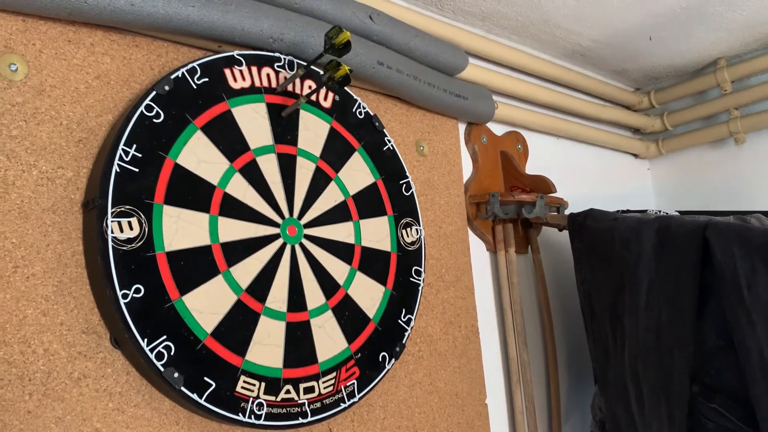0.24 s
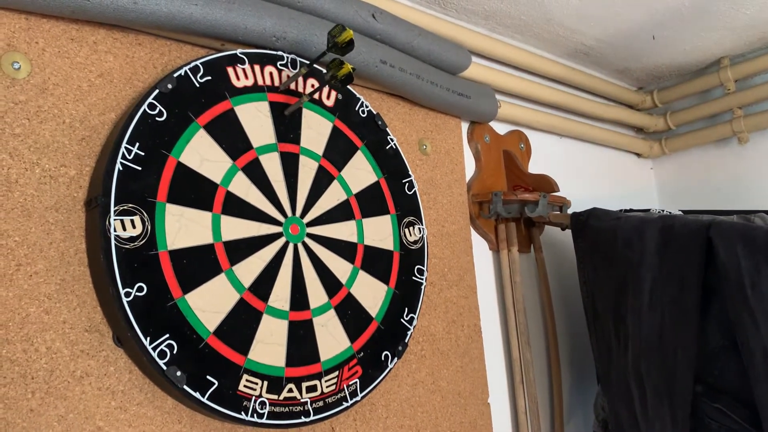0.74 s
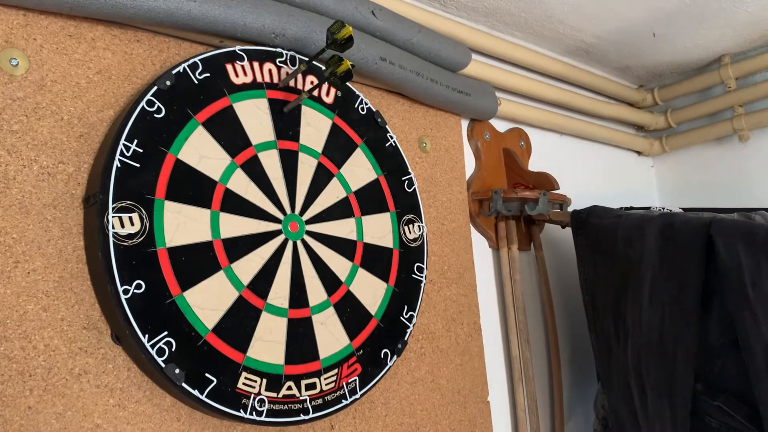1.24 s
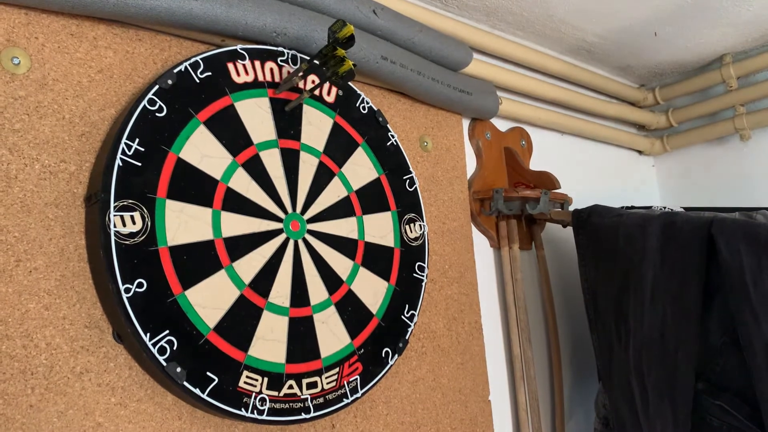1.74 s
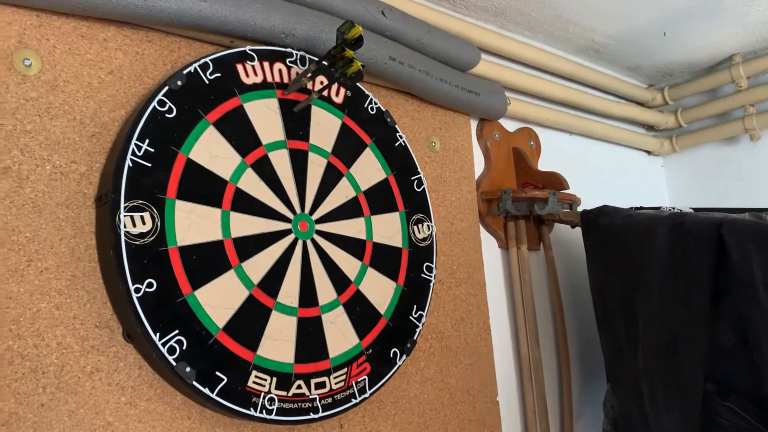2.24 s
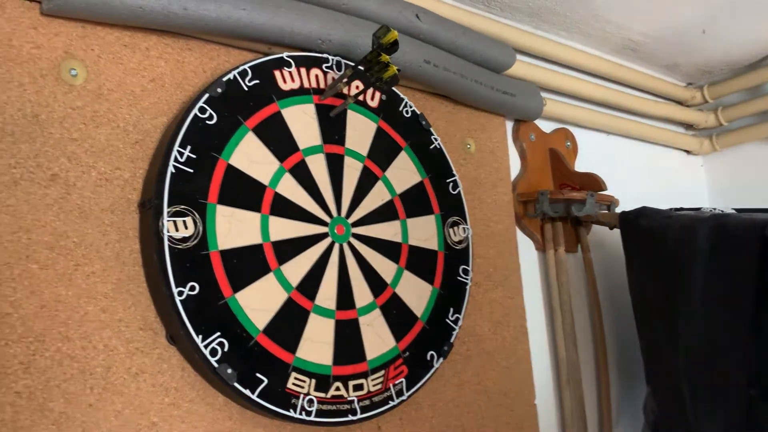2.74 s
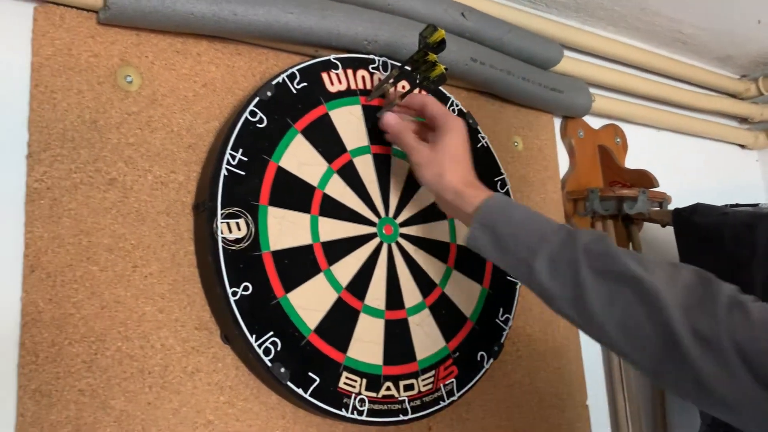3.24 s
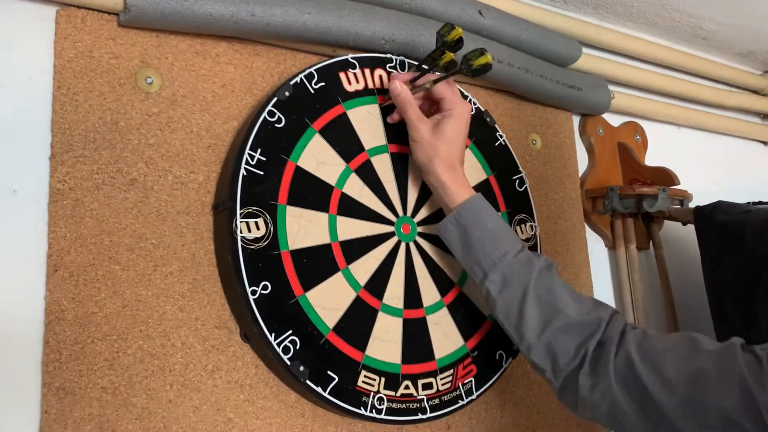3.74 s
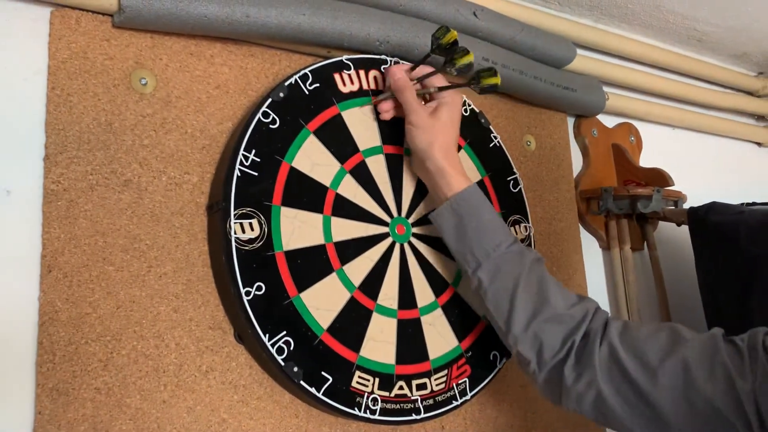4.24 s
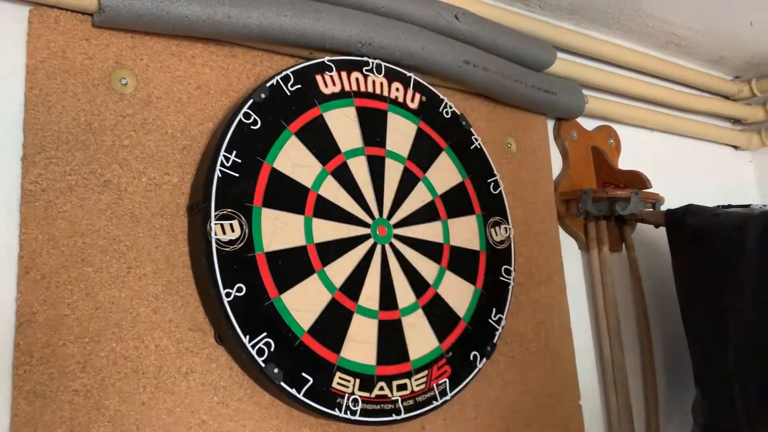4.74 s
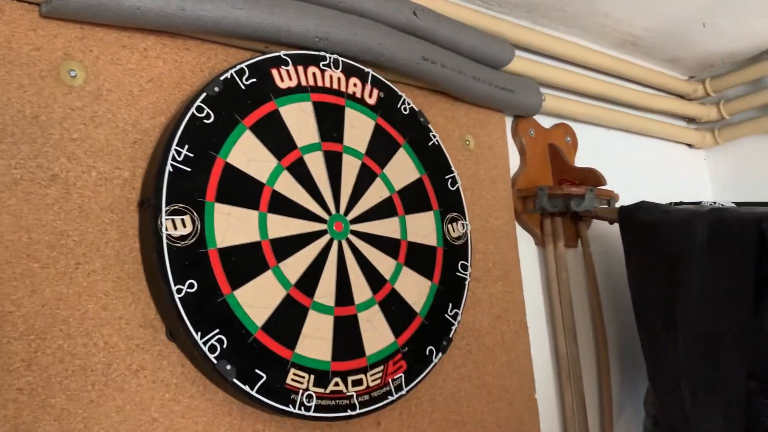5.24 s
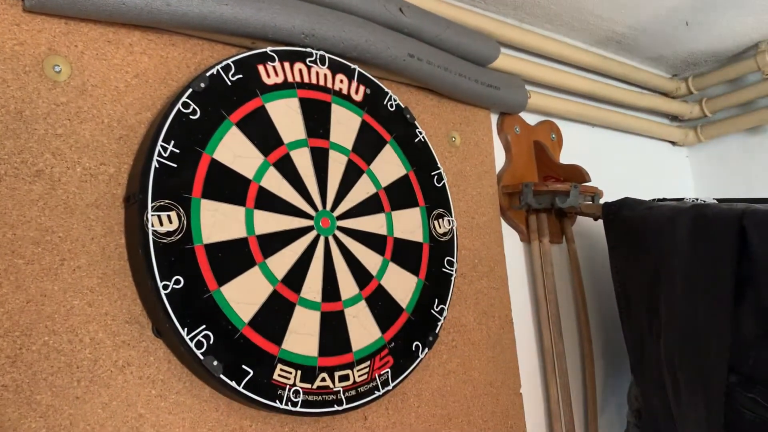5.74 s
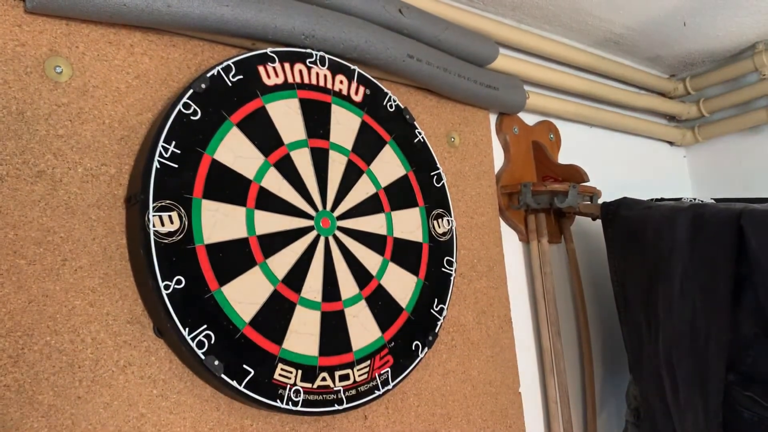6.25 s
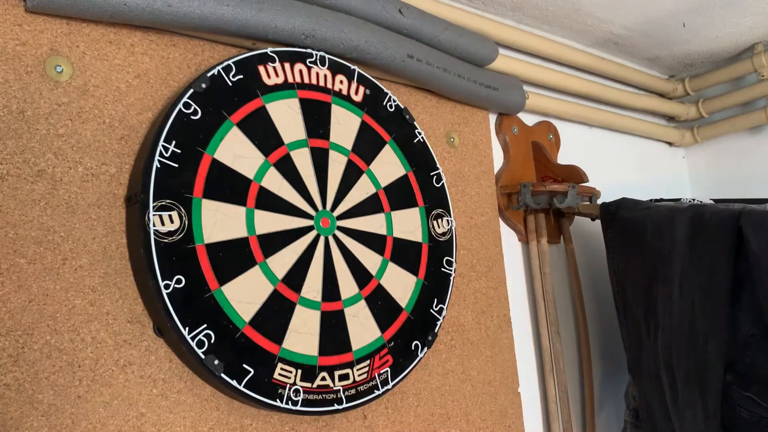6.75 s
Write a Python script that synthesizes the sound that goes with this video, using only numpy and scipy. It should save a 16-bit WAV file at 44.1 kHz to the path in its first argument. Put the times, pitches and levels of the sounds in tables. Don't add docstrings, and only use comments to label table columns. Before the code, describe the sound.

In a small hard-walled basement room, faint hiss and low rumble precede one loud, woody dart thud with a short cork buzz. Soles scuff and knock closer over a hollow floor, sleeves rustling. Three darts are pulled with thin metallic clicks and tiny board knocks, then rattle in the hand as the steps move off. Close handheld stereo microphone.

```python
import sys
import numpy as np
from scipy import signal
from scipy.fft import rfft, irfft
from scipy.io import wavfile
from scipy.ndimage import uniform_filter1d

SR = 44100
rng = np.random.default_rng(int(sys.argv[2]) if len(sys.argv) > 2 else 0)


def convert_level_to_amplitude(level_db):
    exponent = np.asarray(level_db, float) / 20
    return 10 ** exponent


def master(y):
    cut = np.clip(np.atleast_2d(y).T, -1, 1)
    pcm = np.round(cut * 32767)
    wavfile.write(sys.argv[1], SR, pcm.astype(np.int16))


N = 308685
LIFE = np.arange(SR // 2) / SR
USUAL_STEP_DB = -55

# t/s, peak level/dB
THROW = [
    (1.2532, -35),
    (1.262, -19.5),
]
# t/s, sole slap level/dB, heel knock over it level/dB, grit over it level/dB
STEPS = [(0.527, -98, 2, -16), (1.149, -67, -19, -19), (1.995, -59.5, 1, -4), (2.07, -84, 1, -12),
         (2.139, -54.5, 4.5, -13.5), (2.37, -79, 10, -12), (2.402, -73, -20, -15), (2.609, -32.5, -14, -1),
         (2.92, -46, -21, -20), (2.973, -22.5, -9.5, 3.5), (3.284, -52.5, -16, -43.5),
         (3.307, -50.5, -23, -27), (3.339, -36, -15.5, -8), (3.579, -52.5, -19, -11),
         (4.629, -51, -4.5, -7), (4.73, -55, 2.5, -20), (5.209, -40.5, -4.5, -40), (5.259, -42, -6.5, 11),
         (5.359, -68, -19, -15), (5.531, -41, -8, -15), (5.843, -46.5, -14, 4), (5.918, -48, -9.5, 4),
         (6.101, -49, -31, -18), (6.227, -42.5, -37, -6), (6.676, -56, -11, -1.5),
         (6.836, -74, -15.5, -0.5)]
# f/Hz, density level/dB per Hz
SLAP = [(320, -50), (550, -33), (867, -4.5), (1120, -10.5), (1300, -5), (1670, -12.5), (2600, -19),
        (3380, -52), (5720, -120)]


def unit(x):
    return x / np.sqrt(np.mean(x ** 2) + 1e-20)


def along(points, hz):
    f, v = np.transpose(points)
    return np.interp(np.log(hz + 1), np.log(f + 1), v)


def coloured(x, gain):
    n = x.shape[-1]
    return irfft(rfft(x) * gain(np.fft.rfftfreq(n, 1 / SR)), n)


def grains(count, spiky_db, size):
    clumps = unit(uniform_filter1d(rng.standard_normal(count), size=size))
    return rng.standard_normal(count) * convert_level_to_amplitude(spiky_db * clumps)


def paired(pair):
    # f/Hz, left-right likeness/1
    alike = [(30, 0.81), (90, 0.94), (180, 0.8), (550, 0.043), (1650, 0.039), (5000, 0.12), (15000, 0.043)]
    turn = lambda hz: np.arccos(np.clip(along(alike, hz), -1, 1)) / 2
    mid, side = coloured(pair, lambda hz: np.array([np.cos(turn(hz)), np.sin(turn(hz))]))
    return np.array([mid + side, mid - side])


def rush(spectrum, patchy_db, spiky_db):
    catching = convert_level_to_amplitude(spiky_db * unit(uniform_filter1d(rng.standard_normal(N), size=90)))
    z = signal.stft(rng.standard_normal((2, N)) * catching, nperseg=512)[2]
    patches = uniform_filter1d(rng.standard_normal(z.shape[1:]), size=6, axis=0)
    patches = uniform_filter1d(patches, size=9, axis=1)
    pair = signal.istft(z * convert_level_to_amplitude(patchy_db * unit(patches)), nperseg=512)[1][:, :N]
    return unit(paired(coloured(pair, lambda hz: convert_level_to_amplitude(along(spectrum, hz)))))


def ring(modes, attack, scatter_db, detune, slow_cycles=0):
    x = np.zeros(len(LIFE))
    for hz, db, t60 in modes:
        decay = convert_level_to_amplitude(db + scatter_db * rng.normal() - 60 * LIFE / t60)
        tone = np.sin(2 * np.pi * hz * (1 + detune * rng.normal()) * LIFE)
        x += decay * tone * (1 - np.exp(-LIFE / (attack + abs(slow_cycles) / hz)))
    return x / np.abs(x).max()


def crack(spectrum, attack, t60):
    noise = unit(coloured(rng.standard_normal(len(LIFE)), lambda hz: convert_level_to_amplitude(along(spectrum, hz))))
    return noise * convert_level_to_amplitude(-60 * LIFE / t60) * (1 - np.exp(-LIFE / attack))


def room_answer(x):
    # f/Hz, t60/s
    room = [(60, 0.066), (300, 0.31), (1000, 0.21), (4000, 0.22), (10000, 0.16)]
    hz, t, z = signal.stft(rng.standard_normal((2, len(LIFE))), SR, nperseg=256)
    tail = paired(signal.istft(z * convert_level_to_amplitude(-60 * t / along(room, hz)[:, None]), SR, nperseg=256)[1])
    tail = tail[:, :len(LIFE)] * np.clip(LIFE / 0.0025, 0, 1)
    return signal.fftconvolve(x[None], tail / np.linalg.norm(tail[0]), axes=1)[:, :len(LIFE)]


def add(out, s, x, pan_db, wet_db, lead=0):
    walk_off_s, far_wet_db = 4.5, 1.5
    wet = room_answer(x)
    side = np.array([[.5], [-.5]])

    def ports(hz):
        scatter = 2.1 * np.sin(2 * np.pi * (hz / 870 + s)) * hz ** 2 / (hz ** 2 + 1700 ** 2)
        early = 2 * np.pi * hz * lead / SR / (1 + (hz / 3800) ** 4)
        shadow = convert_level_to_amplitude(side * pan_db * hz ** 2 / (hz ** 2 + 350 ** 2))
        return np.exp(1j * side * (early + scatter)) * shadow

    direct = coloured(np.pad(x, (200, 0))[:len(LIFE)], ports)
    out[:, round(s * SR) - 198:][:, :len(LIFE)] += direct
    out[:, round(s * SR):][:, :len(LIFE)] += convert_level_to_amplitude(wet_db + far_wet_db * (s > walk_off_s)) * wet


def swells(rows, rise_db, fade_db_per_s):
    t = np.arange(0, N, 64) / SR
    power = np.zeros(len(t))
    for s, db, rise in rows:
        climb = (s - t) * rise_db / max(rise, .01)
        power += convert_level_to_amplitude(db - np.where(t < s, climb, (t - s) * fade_db_per_s)) ** 2
    return np.interp(np.arange(N) / SR, t, np.sqrt(power))


def throw():
    # f/Hz, level/dB, t60/s
    board = [(94.5, -19, 0.32), (127.7, -24, 0.042), (270, -2, 0.032), (335, -5, 0.045), (411, -12, 0.2),
             (705, 3.5, 0.036), (750, -11, 0.029), (877, -0.5, 0.032), (1120, 8, 0.015), (1189, 5, 0.032),
             (1302, -13.5, 0.03), (1480, -8.5, 0.067), (1602, -34, 0.016), (1830, -11, 0.07),
             (2084, -10.5, 0.013), (6054, -11.5, 0.02), (7100, -24, 0.048)]
    # f/Hz, density level/dB per Hz
    fibres = [(1290, -5), (2200, -11.5), (3740, -10), (5960, -7.5), (7620, -15.5), (10100, -10),
              (10900, -20.5), (11400, -53), (13100, -19), (15500, -22)]
    out = np.zeros((2, N + SR))
    (tick_s, tick_db), (blow_s, blow_db) = THROW
    add(out, tick_s, convert_level_to_amplitude(tick_db - 3.0) * crack(fibres, 0.0065, 0.12), -2, 1.5, lead=3.6)
    blow = ring(board, 0.00076, 0, 0, slow_cycles=0.63)
    blow += convert_level_to_amplitude(-13.5) * crack(SLAP, .001, 0.051)
    blow += convert_level_to_amplitude(-25.0) * crack(fibres, 0.0024, 0.097)
    add(out, blow_s + .001, convert_level_to_amplitude(blow_db + 4) * blow, -2, -8, lead=3.5)
    slap_back = ring(board, 0.0031, 1.5, 0.012, slow_cycles=0.64)
    add(out, blow_s + 0.0074, convert_level_to_amplitude(blow_db - 1.0) * slap_back, -2, -5, lead=3.5)
    return out[:, :N]


def clicks():
    # t/s, click level/dB, shaft level/dB, board knock level/dB, loudest barrel mode f/Hz
    pulled = [(3.387, -53, -19, -3, 5430), (3.4066, -33, -3.5, -7, 3930), (3.4142, -32, -9.5, -11, 5120),
              (3.43, -68, -16, -10, 5100), (3.7215, -70, 6.5, -1.5, 10050),
              (3.7594, -42.5, -7.5, -12, 10000), (3.7694, -48.5, -9, -6.5, 7100),
              (3.8146, -34.5, -15, -18, 5370), (3.836, -38.5, -12, -33, 8820),
              (3.8494, -62.5, -23, -15, 5280), (3.881, -69, -4, -13, 5230), (3.9144, -50.5, 0.5, -6, 5140),
              (3.9295, -48, -1, -34, 5840), (4.002, -42, -8, -13, 6740), (4.1225, -36.5, -12.5, -20, 5190),
              (4.139, -44, -9.5, -7, 5200), (4.178, -71, 2, 8, 4910), (4.2308, -60, -6, 7.5, 7900),
              (4.254, -60, 3, 8, 3630), (4.2701, -57, 0, 1, 7040), (4.33, -61, 2, 1, 4930)]
    # t/s, click level/dB, loudest barrel mode f/Hz
    rattles = [
        (4.81, -54, 7000),
        (5.1095, -56, 4400),
        (5.154, -38, 5730),
        (5.329, -54, 9900),
        (6.121, -65, 5020),
    ]
    # f/Hz, level/dB, t60/s
    shaft_modes = [(1250, -10, .014), (1700, -6, .014), (1950, 0, .018), (2200, -2, .016)]
    barrel_modes = [(3900, -16, .012), (4960, -5, .016), (5600, -5, .014), (7150, -2, .014),
                    (8300, -8, .01), (10200, -3, .014)]
    # f/Hz, level/dB, t60/s
    cork = [(271, -3.5, 0.086), (337, 4, 0.047), (406.4, -16, 0.11), (720, -4, 0.054), (970, -24, 0.05)]
    # f/Hz, density level/dB per Hz
    tick_colour = [(1410, -23.5), (2400, -31), (2660, -17.5), (3960, -9.5), (5320, -3.5), (6520, -13.5),
                   (10200, -9.5), (11800, -15), (13000, -33), (15500, -44.5)]
    out = np.zeros((2, N + SR))
    held = [(s, db, -14, -13, hz, -23) for s, db, hz in rattles]
    for s, db, shaft_db, knock_db, loud_hz, damp_db in [(*row, 0) for row in pulled] + held:
        modes = [(hz, level_db + damp_db, t60) for hz, level_db, t60 in barrel_modes]
        modes.append((loud_hz, 2, .012))
        click = convert_level_to_amplitude(2.0 + damp_db) * crack(tick_colour, .0022, .011)
        click += convert_level_to_amplitude(-8) * ring(modes, .002, 2, .02)
        click += convert_level_to_amplitude(shaft_db + 0.5) * ring(shaft_modes, .001, 2.5, .035)
        click += convert_level_to_amplitude(knock_db - 3.5) * ring(cork, 0.0035, 4.4, 0.025)
        add(out, s, convert_level_to_amplitude(db) * click, -2.5, 0.3, lead=2.4)
    return out[:, :N]


def steps():
    # f/Hz, level/dB, t60/s
    joists = [(50.7, 5, 0.62), (82, -5.5, .35), (129, -5, .3)]
    planks = [(152.3, -6.5, 0.12), (224, -4, 0.029), (233, -4, 0.093), (332.3, -5.5, 0.13),
              (383, -2, 0.062), (432, 2, 0.047)]
    # f/Hz, density level/dB per Hz
    grit = [(1410, -48), (2400, -1.5), (3740, -4), (4080, 0), (4380, -4.5), (6830, -8), (12000, -40),
            (13200, -62), (15500, -70)]
    out = np.zeros((2, N + SR))
    for s, db, knock_db, grit_db in STEPS:
        boom_db = -52.5 + 0.44 * (db + knock_db - USUAL_STEP_DB) - db
        foot = convert_level_to_amplitude(boom_db) * ring(joists, .012, 2.3, 0.033)
        foot += convert_level_to_amplitude(knock_db + 1.5) * ring(planks, 0.0055, 0.94, 0.023)
        foot += convert_level_to_amplitude(-6.0) * crack(SLAP, 0.0018, 0.045)
        foot += convert_level_to_amplitude(grit_db - 6.5) * crack(grit, 0.0045, 0.0294)
        pan_db = -5.5 - .01 * (db - USUAL_STEP_DB)
        add(out, s, convert_level_to_amplitude(db) * foot, pan_db, .4, lead=2)
    return out[:, :N]


def bumps():
    # t/s, peak level/dB, f/Hz
    contacts = [(2.0, -50, 95), (2.071, -57, 674), (2.405, -68, 606), (2.975, -28, 271), (2.98, -39, 50.7),
                (2.99, -43, 127), (3.14, -47, 324), (3.342, -41, 560), (3.357, -38.5, 485),
                (3.829, -62, 286), (4.258, -55, 1050), (4.63, -49.5, 653), (5.26, -36.5, 334),
                (5.27, -36.5, 53), (5.545, -50, 1300), (5.57, -49, 53.8), (5.855, -53, 309)]
    # pitch ratio/1, level/dB, cycles to die by 60 dB/1
    pad = [
        (0.997, 4.5, 29),
        (1.08, -14, 19),
        (0.77, -6.5, 5),
    ]
    out = np.zeros((2, N + SR))
    for s, db, hz in contacts:
        modes = [(hz * ratio, level_db, cycles / hz) for ratio, level_db, cycles in pad]
        add(out, s, convert_level_to_amplitude(db) * ring(modes, 0.18 / hz, 5.5, 0.012), -3, -4)
    return out[:, :N]


def taps():
    # t/s, peak level/dB, f/Hz, cycles to die by 60 dB/1
    small_contacts = [(1.256, -43, 720, 13.5), (1.264, -32, 250, 3.5), (1.282, -31, 750, 30), (1.318, -38, 278, 13),
                      (1.282, -41, 72, 20.5), (2.070, -61.5, 750, 16), (2.958, -40, 1500, 29),
                      (2.973, -29.5, 3370, 25), (2.9734, -25.5, 1395, 21), (2.976, -28, 275, 10.5),
                      (2.994, -30, 88.5, 1.5), (3.285, -62, 1250, 18), (3.308, -53, 1240, 13),
                      (3.338, -40.5, 1840, 26), (3.342, -38, 315, 10), (3.352, -45, 69, 9), (3.385, -49, 1240, 23),
                      (3.407, -31, 4000, 17), (3.4128, -39, 4600, 16), (3.422, -42, 275, 11.5),
                      (3.808, -53, 5340, 30), (3.818, -48.5, 276, 31), (3.838, -51.5, 286, 18.5),
                      (3.896, -54, 2000, 17), (3.914, -49.5, 1260, 40), (3.996, -53, 1960, 22), (4.04, -58, 311, 22),
                      (4.121, -57, 2230, 20), (4.232, -58, 822, 12), (4.811, -61, 7100, 30), (5.136, -51, 6160, 21),
                      (5.1545, -32.5, 5270, 17), (5.21, -51, 455, 24), (5.228, -45, 248, 2), (5.261, -34, 335, 9),
                      (5.272, -41, 256, 13), (5.506, -48, 1490, 17), (5.532, -45.5, 385, 3.5), (5.58, -47, 55.7, 5),
                      (5.846, -60, 704, 11), (5.862, -47.5, 295, 4.5), (6.229, -50, 1160, 1),
                      (1.2645, -24, 500, 3.5), (1.2725, -33, 1220, 13.5), (1.33, -41, 473, 18),
                (1.999, -44.5, 104, 7.5), (2.14, -53, 416, 17), (2.365, -52, 266, 7.5),
                (2.366, -55.5, 720, 17), (2.408, -58, 960, 7), (2.615, -45, 399, 24),
                (2.972, -26.5, 2080, 19), (3.001, -41, 149, 10), (4.1245, -44, 7200, 20),
                (4.33, -56, 4900, 27), (5.11, -44, 4500, 14), (5.225, -46, 145.6, 11), (5.29, -51, 135, 6),
                (5.917, -50, 335, 27), (6.238, -52.5, 254, 10.5), (6.239, -50, 96.7, 5),
                (6.674, -55.5, 1120, 18),
                      (1.2692, -32, 1230, 14), (1.283, -34.5, 1280, 13.5), (1.3, -38.5, 1170, 17),
               (1.308, -39, 1440, 32), (1.31, -38, 955, 19), (1.988, -49, 99, 10), (2.0695, -58, 755, 10),
               (2.611, -42, 1400, 22), (2.944, -46, 1730, 29.5), (2.969, -41, 1820, 20.5),
               (3.339, -43, 1470, 7), (3.385, -55, 2286, 14), (3.4053, -48, 1900, 8),
               (3.4125, -34.5, 1950, 18), (3.47, -56, 4090, 54), (3.7605, -50.5, 3830, 31),
               (3.769, -47, 1590, 11), (3.8155, -49, 9900, 34), (3.835, -49.5, 8000, 26),
               (3.881, -60, 1910, 7), (3.913, -50, 10100, 30), (3.942, -51, 7100, 30),
               (4.0029, -47.5, 6100, 21), (4.005, -51, 7200, 28), (4.012, -61, 2040, 11),
               (4.134, -52, 5700, 32), (4.139, -60.5, 2220, 21), (4.179, -58, 1790, 14),
               (4.2555, -58, 2164, 19), (4.269, -52, 1900, 18), (4.27, -61, 6950, 24),
               (5.212, -49, 1260, 16), (5.26, -42.5, 1940, 25), (5.261, -46, 3220, 24),
               (5.276, -51, 3150, 24), (5.335, -49.5, 7000, 38), (5.362, -52, 1200, 13),
               (5.508, -48, 4160, 34), (5.542, -48, 1370, 24), (5.562, -45, 597, 4.5),
               (5.846, -52.5, 1800, 12), (5.847, -50.5, 3940, 24), (6.117, -54.5, 4960, 37),
               (6.12, -53, 3900, 28), (6.229, -54, 2290, 12), (6.412, -53, 4300, 30.5)]
    # f/Hz, density level/dB per Hz
    thrum = [(150, -31.5), (330, -3.5), (950, 0), (1450, -2.5), (1700, -16.5), (2600, -24.5), (4000, -59)]
    out = np.zeros((2, N + SR))
    for s, db, hz, cycles in small_contacts:
        modes = [(hz, 0, cycles / hz), (hz * 1.25, -7, cycles / hz)]
        add(out, s, convert_level_to_amplitude(db) * ring(modes, 1.23 / hz, 1, 0.013), -1.5, -5, lead=3.6)
    add(out, THROW[1][0] + .006, convert_level_to_amplitude(-37) * crack(thrum, .02, 0.23), -1.5, -3)
    return out[:, :N]


def scuffs():
    strokes = [(1.058, 0.058, -85, 10, 2980), (1.934, 0.069, -64.5, 3, 1484), (2.099, 0.12, -66, 2.5, 5900),
               (2.444, 0.33, -70, -0.5, 1910), (2.929, 0.051, -57.5, 3.5, 4000),
               (3.343, 0.074, -59.5, 2, 6600), (3.4, 0.026, -51, 11.5, 4500),
               (3.799, 0.021, -56.5, 1, 4930), (3.894, 0.08, -65, 7, 7000), (4.127, 0.042, -81, 11, 5500),
               (4.617, 0.033, -62.5, 3, 3800), (5.124, 0.072, -53, 6, 5450),
               (5.255, 0.02, -47.5, -1.5, 2830), (5.485, 0.055, -57, 2.5, 4200),
               (5.84, 0.039, -57, -3, 3870), (6.027, 0.056, -70, 5.5, 5500), (6.112, 0.065, -75, 6, 5700),
               (6.128, 0.096, -73, -5.5, 1480), (6.223, 0.069, -61.5, 5, 5600),
               (6.384, 0.06, -56, 5.5, 3560)]
    # f/Hz, density level/dB per Hz
    drag = [(410, -33), (700, -1), (1540, -12), (1760, -4), (5430, -16), (5940, -13), (10500, -33.5),
            (11500, -55.5), (12900, -35), (15500, -47)]
    out = np.zeros((2, N + SR))
    for s, length, db, bright_db, rasp_hz in strokes:
        stroke = np.sin(np.pi * np.clip(LIFE / length, 0, 1) ** .75) ** 2

        def colour(hz):
            tilt_db = bright_db * np.log2((hz + 1) / 4000)
            rasp_db = 3.0 * np.exp(-(np.log2((hz + 1) / rasp_hz) / 0.33) ** 2)
            return convert_level_to_amplitude(along(drag, hz) + tilt_db + rasp_db)

        friction = coloured(grains(len(LIFE), 2.5, 50), colour)
        add(out, s, convert_level_to_amplitude(db) * stroke * unit(friction), 0, 4)
    return out[:, :N]


def rubs():
    strokes = [(1.682, .12, -79.5, 740), (3.723, 0.03, -73.5, 2100), (4.009, 0.045, -70, 5000),
               (4.681, 0.22, -73.5, 800), (5.139, .05, -56, 3900), (5.29, 0.077, -66, 5500),
               (5.545, 0.057, -64, 1570), (6.111, 0.083, -66, 5800), (6.14, 0.058, -68, 1350),
               (3.159, 0.056, -73, 1030), (1.265, 0.1, -58.5, 5900), (1.3, 0.088, -53, 1400),
               (5.133, .03, -57, 3500), (4.76, 0.074, -69.5, 1300)]
    out = np.zeros((2, N + SR))
    for s, length, db, rub_hz in strokes:
        stroke = np.sin(np.pi * np.clip(LIFE / length, 0, 1) ** .6)
        resonance = lambda hz: np.exp(-(np.log2((hz + 1) / rub_hz) / .55) ** 2)
        squeak = coloured(grains(len(LIFE), 4, 120), resonance)
        add(out, s, convert_level_to_amplitude(db) * stroke * unit(squeak), -1, 0)
    return out[:, :N]


def body():
    # t/s, cloth swish level/dB
    motion = [(0.9, -100), (1.1, -83.5), (1.65, -81), (2.14, -63.5), (2.75, -71.5), (3.04, -64),
              (3.24, -75.5), (3.4, -77), (3.6, -108), (3.8, -68.5), (4.11, -76.5), (4.6, -71.5),
              (5.08, -70.5), (5.18, -58), (5.5, -73), (6.05, -68.5), (6.47, -74), (6.6, -84)]
    # f/Hz, density level/dB per Hz
    cloth = [(880, -17.5), (1500, -0.5), (2970, -8), (6690, -6.5), (10500, -25), (11200, -39),
             (11600, -44.5), (13400, -28), (15500, -32)]
    shuffle = [(88, -39.5), (150, -7.5), (310, -3), (372, -6), (599, -5.5), (937, -11.5), (1110, -7),
               (3500, -27.5), (4550, -49.5), (7700, -120)]
    cloth_s, levels_db = np.transpose(motion)
    cloth_db = np.interp(np.arange(N) / SR, cloth_s, levels_db)
    swish = rush(cloth, patchy_db=1.3, spiky_db=2.2)
    rise_s = 0.005
    slides = [(s + rise_s, -62 + 0.7 * (db + knock_db - USUAL_STEP_DB), rise_s)
              for s, db, knock_db, _ in STEPS]
    feet = np.hypot(convert_level_to_amplitude(cloth_db + 1.5), swells(slides, rise_db=3.1, fade_db_per_s=86))
    return convert_level_to_amplitude(cloth_db) * swish + feet * rush(shuffle, patchy_db=-2.0, spiky_db=2.5)


def house():
    # peak t/s, peak level/dB, rise/s
    loads = [(.3, -66, 0.34), (.55, -58.5, .06), (1.82, -55.5, 0.29), (2.72, -52, 0.26), (3.17, -57, 0.12),
             (5.6, -67, 0.059), (1.11, -55.5, 0.086), (1.29, -38, 0.032), (1.65, -56, 0.11),
             (2.01, -51.5, 0.088), (2.16, -53, 0.043), (2.4, -49.5, 0.53), (2.55, -45, 0.1),
             (2.83, -57, 0.24), (3.0, -30, 0.034), (3.31, -66, .1), (3.49, -61, 0.2), (3.65, -58, 0.097),
             (3.84, -48.5, 0.13), (4.0, -54.5, 0.1), (4.25, -52.5, 0.7), (4.74, -56, 0.99),
             (5.01, -54.5, 0.6), (5.3, -42.5, 0.2), (5.57, -46.5, 0.22), (5.87, -44.5, 0.059),
             (6.28, -44, 0.14), (6.65, -52.5, 0.41), (7.0, -53, 0.91)]
    # f/Hz, density level/dB per Hz
    rumble_colour = [(22, -33.5), (38, 2.5), (97, -1), (135, -5), (167, -26), (190, -14), (250, -47.5),
                     (420, -120)]
    hiss_colour = [(90, -36.5), (150, -5), (210, 1), (350, -6.5), (900, -12), (3000, -20), (7300, -24),
                   (9400, -20.5), (11000, -26.5), (12500, -22.5), (14400, -23), (14700, -59)]
    steady_db, hiss_db = -65.5, -77
    rumble = np.hypot(convert_level_to_amplitude(steady_db), swells(loads, rise_db=19, fade_db_per_s=105))
    rumble = convert_level_to_amplitude(-4.5) * rumble * rush(rumble_colour, patchy_db=0.0, spiky_db=2.5)
    return rumble + convert_level_to_amplitude(hiss_db) * rush(hiss_colour, patchy_db=-2.5, spiky_db=-1.0)


def scene():
    contacts = throw() + clicks() + steps() + bumps() + taps()
    return contacts + scuffs() + rubs() + body() + house()


def roll_off(x):
    return signal.sosfilt(signal.butter(12, 16110, fs=SR, output="sos"), x)


def record(dry):
    gap_hz = (11150, 12350)

    def camera(hz):
        low_cut = hz ** 8 / (hz ** 8 + 41 ** 8)
        gap = np.where((hz > gap_hz[0]) & (hz < gap_hz[1]), convert_level_to_amplitude(-20.5), 1)
        return low_cut * gap * (hz < 15800)

    return roll_off(coloured(dry, camera))


dry = scene()
out = record(dry)
master(out)
```